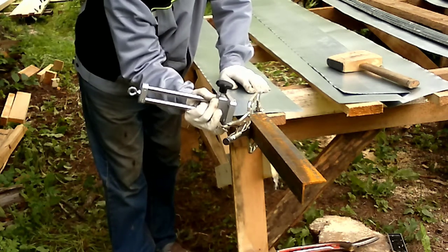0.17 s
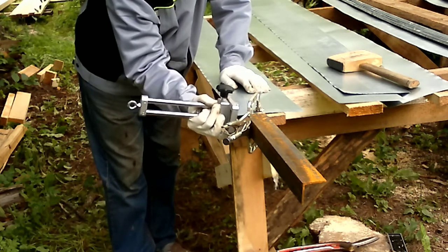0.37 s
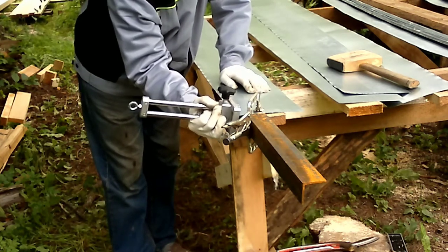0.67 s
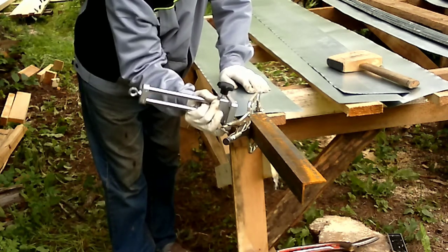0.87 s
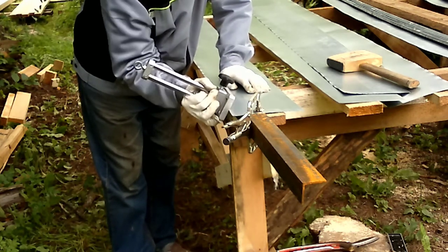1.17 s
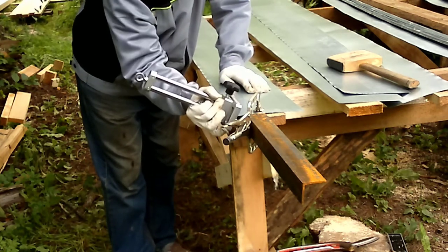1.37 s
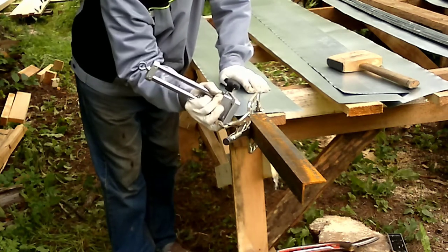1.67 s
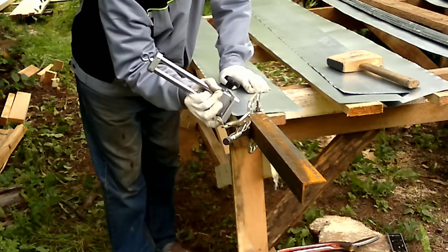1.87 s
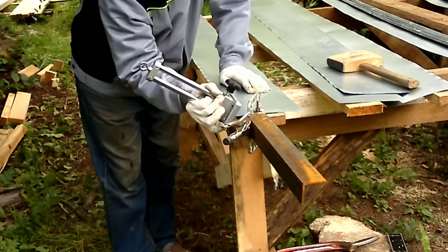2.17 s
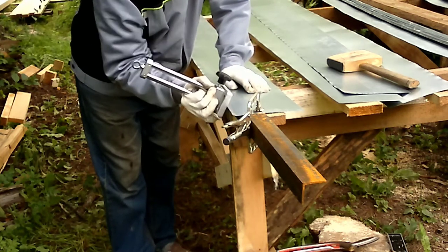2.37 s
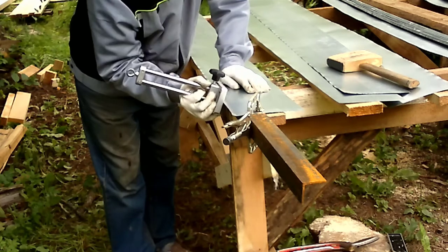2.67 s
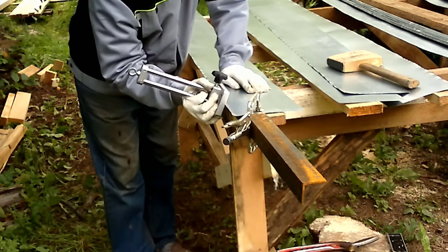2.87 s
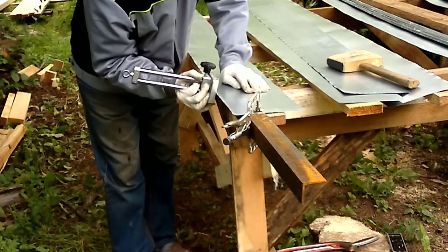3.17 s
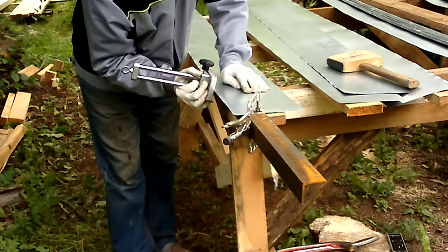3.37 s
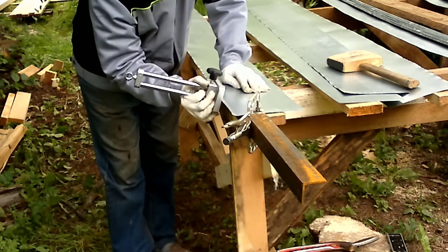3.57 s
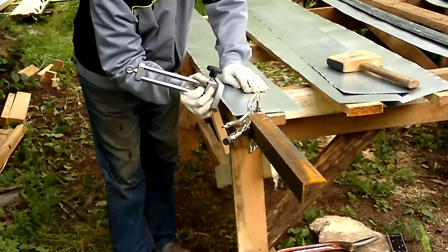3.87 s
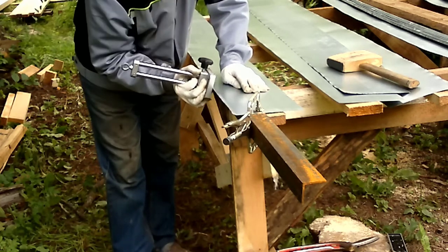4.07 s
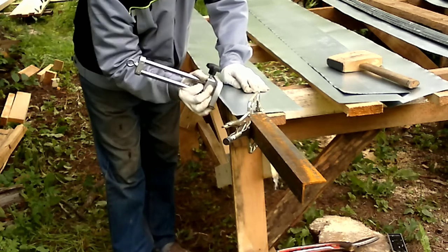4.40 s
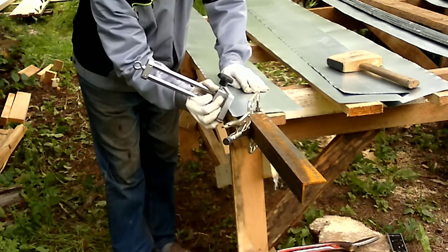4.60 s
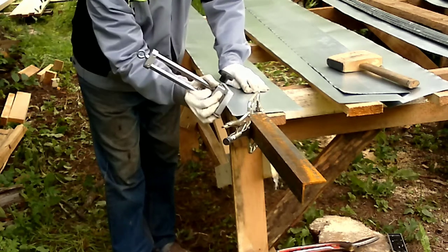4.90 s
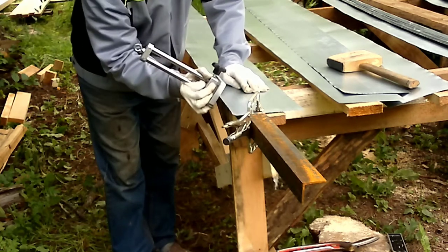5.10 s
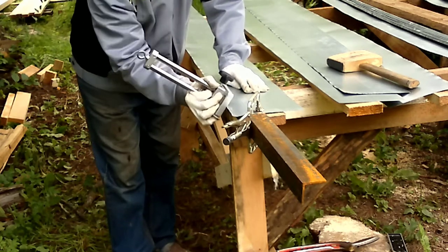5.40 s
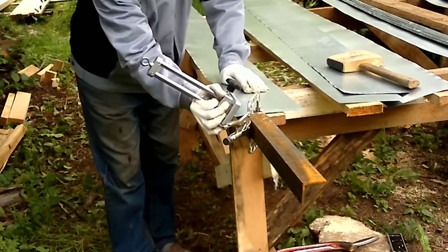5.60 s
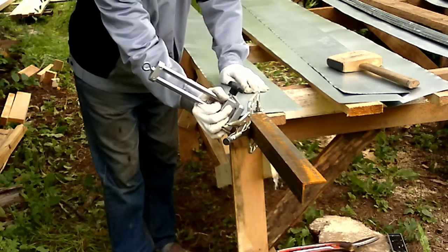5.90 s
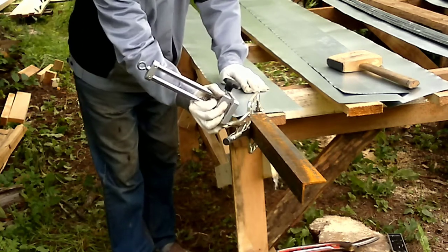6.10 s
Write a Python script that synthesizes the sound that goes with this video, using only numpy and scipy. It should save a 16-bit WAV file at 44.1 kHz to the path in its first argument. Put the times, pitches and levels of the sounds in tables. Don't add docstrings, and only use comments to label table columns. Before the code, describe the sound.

A close outdoor microphone hears a hand roller bender working a steel sheet edge over faint garden hiss and lumpy low wind. At 0.2 s there is a soft drag with a clink. Around 0.9 s the tool breaks loose with a clattering knock and gritty lurch. A push and clink follow at 1.35 s, a knock with a falling squeak at 1.7 s, and a brighter knock, coast and firm drag at 2.2-2.5 s. Lighter scrapes pass near 3.1 s. From 3.4 to 4.2 s strokes crowd together, hard and raspy, rods clinking and the sheet booming. A gust thumps at 4.3 s amid grinding pushes until 4.7 s. Quieter scrapes come near 5 s, then rising squeaks and knocks at 5.3-5.6 s. After a lull, the hardest metallic knock lands at 6.1 s, followed by a final grinding push.

```python
import sys
import numpy as np
from scipy import signal
from scipy.fft import rfft, irfft, next_fast_len
from scipy.io import wavfile
from scipy.ndimage import uniform_filter1d

SR = 44100
rng = np.random.default_rng(int(sys.argv[2]) if len(sys.argv) > 2 else 0)


def how_loud(loudness_db):
    steps = np.asarray(loudness_db, float) / 20
    return 10 ** steps


def master(y):
    cut = np.clip(np.atleast_2d(y).T, -1, 1)
    pcm = np.round(cut * 32767)
    wavfile.write(sys.argv[1], SR, pcm.astype(np.int16))


N = 275625

# (frequency [Hz], density [dB per Hz])
AIR = [(59, -21), (100, -3.5), (140, -18), (224, -19), (315, -12), (343, -17.5), (406, -15), (818, -20.5),
       (1060, -19.5), (1130, -24.5), (1680, -26.5), (13200, -35.5), (16000, -39)]
AIR_DB, AIR_RISE_DB_PER_S = -59, 0.56
# (time [s], level [dB])
GUSTS = [(0.0, -55), (0.85, -55), (1.13, -49.5), (1.2, -57), (1.76, -55), (1.9, -60), (1.93, -48.5),
         (2.05, -54), (2.91, -56.5), (3.03, -48.5), (3.86, -53.5), (4.3, -48), (4.33, -43), (4.38, -59),
         (5.17, -51.5), (5.22, -60.5), (6.23, -54), (6.25, -61)]
# (frequency [Hz], density [dB per Hz])
WIND = [(8.8, -40), (15, 10.5), (32, -6), (48, 5.5), (130, -13), (200, -12), (260, -29), (440, -120)]
LUMP_DB, LUMPS_PER_S = 2.5, 22
# (time [s], level [dB], frequency [Hz], length [s])
PUFFS = [
    (1.931, -41, 42.5, 0.055),
    (4.314, -27.5, 38.6, 0.031),
]

# (frequency [Hz], level [dB])
SHEET = [(100, -17), (200, 7), (350, 0), (450, 11.5), (600, 10), (1100, 2.5), (2050, 6), (2450, 6),
         (2800, -3.5), (3600, -6.5), (6000, -18), (10000, -16), (12500, -76)]
# (frequency [Hz], level [dB])
LEADING_MODES = [(670, 3), (925, 5), (1240, 3), (1450, 3), (1660, 4), (1760, 3), (1940, 3), (2260, 3)]
# (frequency [Hz], width [Hz], level [dB])
ROLLER = [(4050, 250, -7), (4380, 280, 0), (4700, 350, 0), (5500, 900, -15), (7400, 2000, -17),
          (9050, 300, -10)]
# (frequency [Hz], level [dB], 60 dB decay [s])
RODS = [(8630, -10, .05), (8910, -12, .06), (9050, 0, .085), (9360, -12, .05), (9980, -14, .04),
        (6890, -16, .03), (7500, -18, .03), (11600, -22, .03), (12650, -22, .03)]
# (frequency [Hz], level [dB])
CRACK = [(400, 2.5), (1500, 4), (3000, -0.5), (6000, -2.5), (7500, 1.5), (10200, -3), (11500, -19),
         (15000, -20.5)]

# (start [s], length [s], level [dB], first pitch [Hz], last pitch [Hz])
SQUEAKS = [(.19, 0.12, -55.5, 1380, 1670), (0.81, 0.17, -56, 1010, 1150), (1.696, 0.085, -46, 2300, 1660),
           (2.252, 0.094, -44, 2360, 1600), (3.107, 0.15, -50.5, 2580, 1650),
           (3.614, 0.079, -57, 2900, 2400), (4.871, 0.18, -51.5, 880, 930),
           (5.321, 0.11, -38.5, 1170, 1450), (5.41, .09, -42.5, 1550, 2000), (5.732, 0.1, -72, 1350, 1270),
           (.92, 0.072, -51.5, 4670, 4600), (1.68, 0.073, -57, 4500, 4500),
           (2.23, 0.096, -51.5, 4630, 4570), (6.105, 0.07, -44, 4250, 4400),
           (4.93, 0.21, -62.5, 3300, 3100), (4.3, 0.38, -61.5, 3020, 3130), (3.58, 0.081, -46, 2500, 2420)]
SQUEAK_WIDTH = 0.11
# (time [s], strength [dB], pitch [Hz])
JOLTS = [(.252, -33, 1638), (.276, -33, 1045), (.859, -44, 1052), (.929, -21, 1608), (.972, -22.5, 1470),
         (1.355, -30.5, 1560), (1.375, -33, 1690), (1.965, -36.5, 1346), (2.247, -17, 1810),
         (2.351, -22.5, 1144), (2.424, -19.5, 1138), (2.699, -48.5, 1025), (2.737, -46, 1190),
         (2.799, -46, 1078), (2.979, -34.5, 1567), (3.053, -28, 1255), (3.125, -30.5, 1056),
         (3.583, -27, 907), (3.608, -16.5, 1504), (3.968, -20.5, 1053), (4.502, -24, 931),
         (4.522, -24, 1120), (4.579, -22, 1306), (4.876, -44.5, 885), (4.95, -30.5, 895),
         (5.084, -32.5, 1220), (5.406, -23.5, 1684), (5.501, -17, 2303), (6.119, -9.5, 1632),
         (6.163, -17, 1223)]
JOLT_CYCLES = 111
# (time [s], rod ring [dB], crack [dB])
CLINKS = [(0.253, -47, 2.5), (1.352, -43, 2.5), (2.0023, -58, 7), (2.4763, -67, -4), (3.1268, -52, 4.5),
          (3.4818, -62, 7), (3.5277, -36.5, -3.5), (3.5741, -38.5, 3), (3.6074, -41.5, 2), (3.668, -61, 15),
          (3.905, -58.5, 6.5), (3.941, -49.5, 6), (3.9648, -38.5, -1), (4.4745, -36.5, -4),
          (4.5158, -53, -13), (4.563, -60.5, 9), (5.323, -49.5, 1), (5.3975, -40, -1.5), (5.4876, -39, 3),
          (5.9047, -56, 4.5)]
# (time [s], rod ring [dB], roller ring [dB], crack [dB])
KNOCKS = [(0.9187, -38, 12.5, 3.5), (0.933, -51, 23.5, -18), (0.9708, -48.5, -5, 4.5),
          (1.371, -57, 14.5, 10), (1.6764, -41.5, 14, 6.5), (1.713, -53, 15, 7), (2.2286, -42.5, 16, 9.5),
          (2.2492, -58.5, 34, -2), (2.613, -72, 18, -3), (2.976, -54.5, 14, 7.5), (3.09, -60.5, 17, 12.5),
          (3.63, -44.5, 11.5, 8.5), (4.0347, -56, 2, 5), (5.5021, -40, 15.5, 6), (5.5639, -33, 6.5, -2.5),
          (6.0975, -23.5, 2, -7.5), (6.1138, -33, 14.5, 3), (6.1497, -52, 19, 16)]
CLINK_ROLLER_DB, KNOCK_RING, CLINK_RING = -7, 1, 0.65

# (time [s], pressure [dB], pitch [Hz])
NUDGES = [(0.864, -60, 1010), (3.84, -58, 1050), (1.091, -54.5, 1282), (2.741, -57.5, 1130),
          (2.819, -64.5, 1010), (4.72, -60, 949.7), (5.03, -46.5, 1650), (5.83, -65, 910), (5.96, -76, 805),
          (.25, -54.5, 510), (3.05, -51.5, 524), (5.91, -62, 1480), (6.07, -62, 1190)]
# (time [s], length [s], pressure [dB], pitch [Hz])
LURCHES = [
    (0.922, .14, -29, 1280),
    (1.677, 0.12, -32.5, 1076),
    (2.228, 0.16, -30, 1490),
    (2.614, 0.033, -45.5, 1130),
    (3.963, .14, -25, 1090),
    (5.565, .08, -37.5, 1470),
    (6.102, 0.2, -30.5, 1570),
]
NUDGE_S, LURCH_RISE_S = 0.05, 0.003
# (start [s], hardest [s], end [s], pressure [dB], pitch of the gripped span [Hz])
DRAGS = [
    (.15, .24, .33, -44.5, 1000),
    (2.33, 2.43, 2.54, -32.5, 1070),
    (2.46, 2.52, 2.6, -58, 860),
    (2.92, 3.05, 3.11, -40, 1230),
    (3.15, 3.26, 3.4, -53.5, 940),
    (3.55, 3.645, 3.73, -31, 1790),
    (3.96, 4.06, 4.17, -30, 1350),
    (4.06, 4.14, 4.2, -38, 1150),
    (4.52, 4.64, 4.69, -35.5, 1210),
    (5.1, 5.16, 5.2, -56, 870),
]
# (start [s], hardest [s], end [s], pressure [dB], pitch of the gripped span [Hz])
PUSHES = [(1.21, 1.339, 1.356, -40, 1080), (1.33, 1.37, 1.42, -38, 1370), (1.941, 1.98, 2.1, -44, 1330),
          (2.288, 2.365, 2.41, -38, 1220), (3.09, 3.136, 3.28, -41, 1950),
          (3.429, 3.594, 3.66, -27.5, 1060), (3.859, 3.93, 3.99, -32, 1160), (4.27, 4.37, 4.52, -32, 1170),
          (4.37, 4.5, 4.65, -29, 1690), (4.89, 4.975, 5.07, -39.5, 1450), (5.03, 5.082, 5.18, -40.5, 1400),
          (5.28, 5.365, 5.45, -36, 1330), (5.38, 5.502, 5.58, -31.5, 1620), (6.1, 6.2, 6.38, -31.5, 1530)]
# (sheet bass [dB], sheet treble [dB], roller hiss [dB])
PUSH_TONE, DRAG_TONE = (-16, -9.5, -36), (-7.4, -9.5, -39)
LURCH_TONE, NUDGE_TONE = (-18.5, -6.5, -7), (-0.5, -8, -2)
EASE_DB, EASE_POWER = 34, 1.834
SAG_OCTAVES = 0.057
BASS_PER_OCTAVE_DB, TREBLE_PER_OCTAVE_DB = -7.5, 11.5
BASS_LINGER, TREBLE_LINGER = 0.6, 0.18
THUD_DB, THUD_HZ, THUD_DELAY_S, THUD_S = -21.5, 107, 0.0144, 0.13

# (frequency [Hz], level [dB])
MASKED = [(10500, -80), (11500, -62), (15700, -56)]
EDGE_HZ = 15790


def evened(x):
    return x / np.sqrt(np.mean(x ** 2) + 1e-20)


def read(points, hz):
    f, value = np.transpose(points)
    return np.interp(np.log(hz + 1), np.log(f + 1), value)


def filtered(x, points):
    size = next_fast_len(len(x) + 512)
    gain = how_loud(read(points, np.fft.rfftfreq(size, 1 / SR)))
    return irfft(rfft(x, size) * gain, size)[:len(x)]


def coloured(points):
    return evened(filtered(rng.standard_normal(N), points))


def wander(count, per_s):
    knots = rng.standard_normal(int(count / SR * 200) + 3)
    place = np.arange(count) / SR * min(per_s, 199)
    return evened(np.interp(place, np.arange(len(knots)), knots))


def resonate(x, hz, width):
    r = np.exp(-np.pi * width / SR)
    pole = r * np.exp(2j * np.pi * hz / SR)
    return np.sqrt(2 * (1 - r * r)) * signal.lfilter([1], [1, -pole], x).real


def steep(x, hz, width):
    return resonate(resonate(x, hz, width), hz, width) * np.sqrt(width / SR)


def add(mix, s, sound):
    part = mix[round(s * SR):][:len(sound)]
    part += sound[:len(part)]


def garden_air():
    t = np.arange(N) / SR
    rise_db = AIR_RISE_DB_PER_S * (t - N / 2 / SR)
    return how_loud(AIR_DB + rise_db + 0.5 * wander(N, per_s=8)) * coloured(AIR)


def wind():
    s, level_db = np.transpose(GUSTS)
    gust_db = np.interp(np.arange(N) / SR, s, level_db) + 0.5
    out = coloured(WIND) * how_loud(gust_db + LUMP_DB * wander(N, per_s=LUMPS_PER_S))
    for at, db, hz, length in PUFFS:
        t = np.arange(0, length, 1 / SR)
        add(out, at, how_loud(db) * np.sin(2 * np.pi * hz * t) * np.hanning(len(t)))
    return out


def yard(x):
    t = np.arange(9000) / SR
    hits = (rng.random(len(t)) < 0.05) * (t > 0.003)
    taps = hits * rng.standard_normal(len(t)) * how_loud(-60 * t / 0.16)
    return signal.oaconvolve(x, taps / np.linalg.norm(taps))[:N]


def thud(s, db):
    t = np.arange(0, THUD_S, 1 / SR)
    shake = evened(steep(rng.standard_normal(len(t)), THUD_HZ, 140))
    return s + THUD_DELAY_S, how_loud(db + THUD_DB) * shake * np.sin(np.pi * (t / THUD_S) ** 0.31) ** 2


def grit(count, per_s, spread_db):
    chance, size, sign = rng.random((count, 3)).T
    strength = how_loud(-spread_db * np.log(size + 0.012))
    return evened((chance < per_s / SR) * strength * (sign - 0.5))


def squeak(s, length, db, first_hz, last_hz):
    t = np.arange(0, length, 1 / SR)
    glide_hz = np.geomspace(first_hz, last_hz, len(t))
    turn = np.exp(2j * np.pi * np.cumsum(glide_hz) / SR)
    r = np.exp(-np.pi * SQUEAK_WIDTH * first_hz / SR)
    drive = grit(len(t), per_s=6000, spread_db=3.5)
    sung = signal.lfilter([1], [1, -2 * r, r * r], drive / turn) * turn
    return s, how_loud(db) * evened(sung.real) * signal.windows.tukey(len(t), 0.7)


def jolt(s, db, hz, t60):
    t = np.arange(6000) / SR
    spread, phase = rng.random((2, 12, 1))
    mode_hz = hz * 2 ** (4.5 * (spread - 0.5) ** 3)
    ring = np.sin(2 * np.pi * (mode_hz * t + phase)).sum(axis=0)
    swell = how_loud(db - 18.5 - 60 * t / max(t60, 0.01)) * np.minimum(t / 0.0032, 1)
    return s, filtered(swell * ring, SHEET)


def tick(s, db, roller_db, crack_db, ring):
    t = np.arange(6000) / SR
    phase, scatter = rng.random((2, len(RODS)))
    rods = np.zeros(len(t))
    for (hz, level, t60), p, d in zip(RODS, phase, scatter):
        decay_s = t60 * ring * (0.6 + 0.7 * p)
        rods += how_loud(level + 13 * (d - 0.5) - 60 * t / decay_s) * np.sin(2 * np.pi * (hz * t + p))
    a, b = rng.standard_normal((2, len(t)))
    crack = how_loud(crack_db + 3.5 - 60 * t / 0.042) * filtered(a, CRACK)
    detune = 0.943 + 0.088 * scatter[0]
    buzz = sum(how_loud(level) * steep(b, hz * detune, 1.2 * width) for hz, width, level in ROLLER[:4])
    buzz = how_loud(roller_db - 9.5 - 60 * t / 0.13) * buzz
    return s, how_loud(db) * (rods + crack + buzz) * np.minimum(t / 0.0015, 1)


def controls(start, hardest, end, db, hz, tone):
    t = np.arange(start, end, 1 / SR)
    side_s = np.where(t < hardest, max(hardest - start, 0.001), max(end - hardest, 0.001))
    u = (t - hardest) / side_s
    eased_db = EASE_DB * abs(u) ** EASE_POWER
    octaves = np.log2(hz / 1250) - SAG_OCTAVES * u
    bass_db = tone[0] + BASS_PER_OCTAVE_DB * octaves + BASS_LINGER * eased_db
    treble_db = tone[1] + TREBLE_PER_OCTAVE_DB * octaves + TREBLE_LINGER * eased_db
    return t, db - eased_db, hz * 2 ** (-SAG_OCTAVES * u), bass_db, treble_db, tone[2]


def stroke(t, press_db, span_hz, bass_db, treble_db, hiss_db):
    drive = grit(len(t), per_s=9900, spread_db=3.5) * how_loud(0.94 * wander(len(t), per_s=69.1))
    loose = np.linspace(140, 3200, 56) + rng.uniform(-25, 25, 56)
    sheet = how_loud(17 + 0.82 * treble_db) * drive
    for k, (hz, lead_db) in enumerate(LEADING_MODES + [(hz, 0) for hz in loose]):
        low = np.clip((900 - hz) / 250, 0, 1)
        high = np.clip((hz - 1500) / 800, 0, 1)
        focus_db = 6.5 * np.exp(-(np.log2(hz / span_hz) / 0.24) ** 2)
        contact_db = 2.1 * wander(len(t), per_s=35)
        level_db = lead_db + low * bass_db + high * treble_db + focus_db + contact_db
        level = np.repeat(how_loud(level_db[::8]), 8)[:len(t)]
        sheet += (-1) ** k * level * resonate(drive, hz, 45 + 0.053 * hz)
    hiss = sum(how_loud(db) * steep(drive, hz, width) for hz, width, db in ROLLER)
    radiated = filtered(how_loud(press_db - 20.0) * sheet, SHEET)
    edge = signal.windows.tukey(len(t), 0.02)
    return t[0], edge * (radiated + how_loud(press_db + hiss_db - 18.0) * hiss)


def scene():
    work = np.zeros(N)
    for row in SQUEAKS:
        add(work, *squeak(*row))
    for s, db, hz in JOLTS:
        add(work, *jolt(s, db, hz, JOLT_CYCLES / hz))
    for s, db, crack_db in CLINKS:
        add(work, *tick(s, db, CLINK_ROLLER_DB, crack_db, CLINK_RING))
    for row in KNOCKS:
        add(work, *tick(*row, KNOCK_RING))
    for s, db, hz in NUDGES:
        add(work, *stroke(*controls(s - NUDGE_S, s, s + NUDGE_S, db, hz, NUDGE_TONE)))
    for s, length, db, hz in LURCHES:
        add(work, *stroke(*controls(s - LURCH_RISE_S, s, s + length, db, hz, LURCH_TONE)))
        add(work, *thud(s, db))
    for table, tone in ((DRAGS, DRAG_TONE), (PUSHES, PUSH_TONE)):
        for row in table:
            add(work, *stroke(*controls(*row, tone)))
    return (garden_air() + wind() + work + how_loud(-11.5) * yard(work))[None]


def low_pass(x):
    return signal.sosfilt(signal.butter(12, 16330, fs=SR, output="sos"), x)


def record(dry):
    lowpass = signal.firwin(511, EDGE_HZ, window=("kaiser", 9), fs=SR)
    dry = signal.oaconvolve(dry, lowpass[None], "same")
    hz, _, z = signal.stft(dry, SR, nperseg=1024)
    power = abs(z) ** 2
    luck_db = 13 * uniform_filter1d(rng.standard_normal(z.shape), 8, axis=1)
    limit = power.sum(axis=1, keepdims=True) * how_loud(2 * (read(MASKED, hz)[:, None] + luck_db))
    kept = (uniform_filter1d(power, 12, axis=1) > limit) | (hz < 10500)[:, None]
    thinned = signal.istft(z * kept, SR, nperseg=1024)[1][:, :N]
    return low_pass(thinned)


dry = scene()
out = record(dry)
master(out)
```